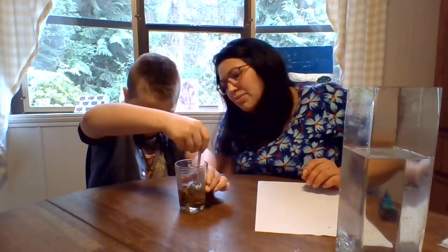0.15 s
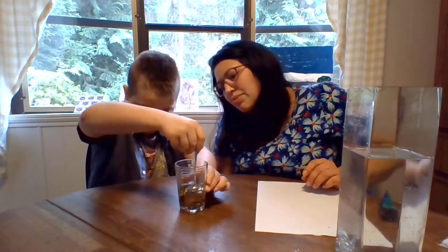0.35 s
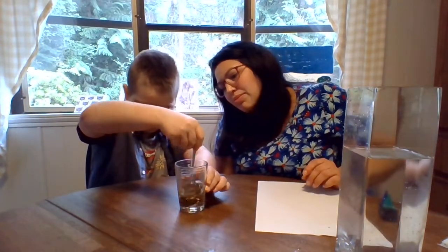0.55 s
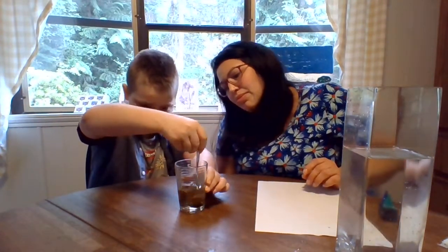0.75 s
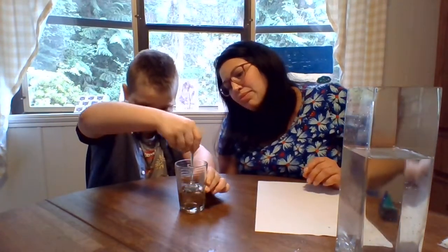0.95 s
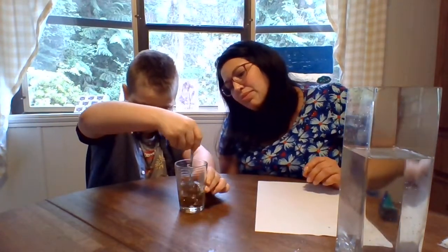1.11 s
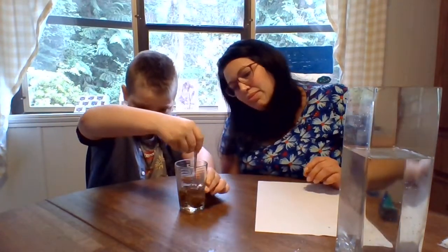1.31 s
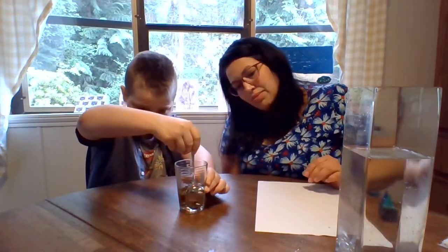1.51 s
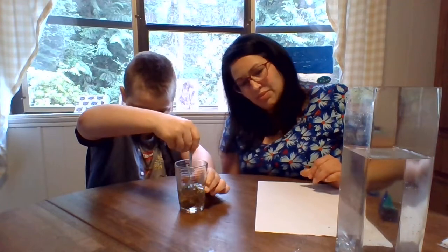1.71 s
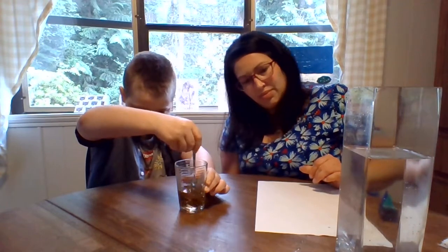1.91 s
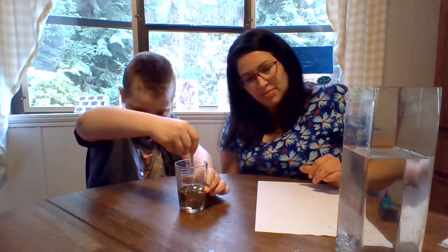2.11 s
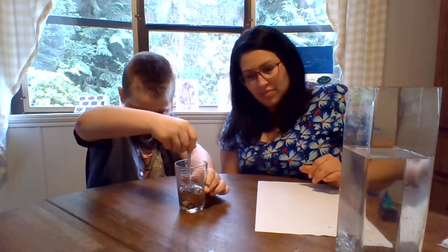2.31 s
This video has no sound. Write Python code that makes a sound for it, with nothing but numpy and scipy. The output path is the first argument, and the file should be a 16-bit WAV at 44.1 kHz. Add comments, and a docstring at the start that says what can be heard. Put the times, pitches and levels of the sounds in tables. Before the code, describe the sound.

A metal spoon stirs liquid in a small glass, clinking four times over dull table knocks.

```python
"""A low churning rumble, then a metal spoon clinks brightly on the wall of a small glass. On each turn the
glass rings with a rough, wavering shimmer and bumps the wooden table, which knocks. Between turns the spoon
sticks and slips along the glass with a soft, squeaky scrape. A small room gives the hits a short tail; the
microphone adds hiss, hum and a faint whine."""
import sys
import numpy as np
from scipy import signal
from scipy.fft import rfft, irfft
from scipy.io import wavfile
from scipy.ndimage import uniform_filter1d, map_coordinates

SR = 44100
rng = np.random.default_rng(int(sys.argv[2]) if len(sys.argv) > 2 else 0)


def put_to_file(sound):
    """Save the sound as 16-bit audio at rate SR, in the file named by the first command-line argument."""
    columns = np.atleast_2d(sound).T  # one column per channel
    safe = np.clip(columns, -1, 1)
    whole_steps = np.round(safe * 32767)
    wavfile.write(sys.argv[1], SR, whole_steps.astype(np.int16))


N = 103635
TIME = np.arange(N) / SR

# colour of the microphone hiss: f/Hz, level/dB
HISS_COLOUR = [(30, -52), (80, 2), (400, 5.5), (1500, -1), (3000, -13.5), (6000, -14), (10000, -5.5),
               (11300, -9), (12500, -95)]
# hum and whine tones: f/Hz, rms level/dB
WHINE_TONES = [(85, -66), (2003, -75.5), (4011, -75.5), (5012, -75), (6013, -80), (8699, -76),
               (11025, -74.5)]
# colour of the low churning: f/Hz, level/dB
CHURN_COLOUR = [(45, -54), (80, -14), (115, 1), (150, 2.5), (200, -5.5), (290, -4), (400, -19.5),
                (600, -24.5), (850, -26.5), (1300, -36), (3000, -49.5)]
# fader ride of the churning: t/s, level/dB
CHURN_RIDE = [(0, -41.5), (0.148, -53.5), (.36, -39), (.44, -49), (0.489, -42.5), (.56, -58), (.72, -43.5),
              (.96, -42), (1.01, -53.5), (1.07, -44), (1.128, -50.5), (1.21, -45.5), (1.32, -39.5),
              (1.49, -57), (1.55, -44.5), (1.69, -45.5), (1.729, -52), (1.78, -43.5), (1.87, -45),
              (1.97, -41), (2.16, -55), (2.218, -40), (2.35, -65.5)]
# colour of the spoon's scrape: f/Hz, level/dB
SCRAPE_COLOUR = [(300, -15), (650, -17), (780, -7.5), (850, -4.5), (930, -17), (1100, -33), (1650, -24),
                 (2200, -46), (8000, -50)]
# spoon rubs the glass: t/s, length/s, level/dB, scrape trim/dB
RUB_CUES = [(.01, 0.083, -60, 13), (0.094, 0.06, -57.5, 12), (0.645, 0.049, -53, 8.5),
            (1.136, .11, -46.5, -2.5), (1.415, 0.13, -55.5, 3), (1.844, 0.055, -58, 4),
            (1.93, 0.05, -30, -13), (1.982, 0.027, -34.5, -4.5), (2.147, 0.16, -60.5, 8.5)]
# colour of the crack when the spoon makes contact: f/Hz, level/dB
CRACK_COLOUR = [(100, -35), (400, -39), (2500, 22), (5500, 13), (8000, -3.5), (10000, 17.5), (12000, -4.5)]
# tick of a light spoon touch: f/Hz, level/dB, t60/s
TICK_MODES = [(3416, -11.5, 0.097), (3840, -8.5, 0.018), (4330, -6, 0.013), (8120, -3, 0.024)]
# table top with the glass on it: f/Hz, level/dB, t60/s
TABLE_MODES = [(113, -31.5, 0.23), (133.1, -32.5, 0.34), (170.5, -15.5, 0.16), (245.6, -22, .25),
               (270.9, -21, 0.21), (318, -17, 0.19), (380.5, -16.5, 0.16), (418.5, -16.5, 0.2),
               (525.4, -19.5, 0.14), (618, -29, .2), (824.5, -25.5, 0.16), (1003, -34.5, 0.14),
               (1577, -37.5, 0.066), (1662, -36, 0.34)]
# colour of the room tail after a knock: f/Hz, level/dB
KNOCK_TAIL_COLOUR = [(45, -18), (110, -12), (200, 0), (340, -13.5), (570, -6.5), (700, -8), (860, -2),
                     (1150, -8), (1500, -9), (2100, -21), (3400, -19.5), (4500, -25), (10000, -21.5)]
# glass bumps the table: t/s, knock level/dB, low-pass f/Hz, tick level/dB
KNOCK_CUES = [(0.2011, -12.5, 1500, -51), (0.2264, -8.5, 497, -32), (0.2658, -1, 1870, -24),
              (0.6075, -7.5, 560, -45.5), (0.777, -24.5, 2500, -37), (.806, -12.5, 493, -33),
              (0.8425, -1, 1870, -29.5), (1.344, -24, 1970, -43), (1.3706, -8.5, 1330, -33),
              (1.788, -29, 49, -83), (1.859, -14, 69, -80), (2.013, -9, 700, -53), (2.043, -5, 1430, -34)]
# the spoon's own short ping: f/Hz, level/dB, t60/s
PING_MODES = [(4860, -31.5, 0.029), (6340, -38, 0.06), (8200, -27, 0.024), (8140, -15.5, 0.0073)]
# ring of glass and spoon: f/Hz, level/dB, build-up/s, base hold/s, t60/s, shimmer f/Hz, shimmer depth
GLASS_MODES = [(2578, -44, 0.0026, 0.064, 0.31, 68, 4.5), (2725, -37.5, .004, 0.041, 0.34, 38.7, 1.8),
               (2762, -35.5, 0.084, 0.13, 0.21, 21.3, 0.75), (3847, -44, 0.008, 0.049, 0.39, 250, 3.6),
               (5560, -50.5, 0.012, 0.21, 0.1, 51.8, 0.71), (6342, -37.5, 0.0058, 0.1, 0.22, 2, 0.43),
               (8165, -35, 0.0023, 0.077, 0.41, 110, 0.91), (8208, -30, .002, 0.093, 0.23, 33.5, 1.5),
               (10650, -49, .004, 0.044, 0.49, 260, 2.5), (11320, -40.5, 0.0016, 0.0083, 0.36, 82, 0.54)]
# EQ points that shade the ring from clink to clink: f/Hz
RING_EQ_HZ = [2716, 2750, 6342, 8200]
# colour of the room tail after a clink: f/Hz, level/dB
CLINK_TAIL_COLOUR = [(80, -16), (300, 31), (900, 10), (1700, 14.5), (2100, 5), (2600, 9.5), (3200, -1.5),
                     (4600, -2), (6500, 5.5), (7900, 8.5), (8900, -0.5), (11500, -14)]
# spoon strikes the wall: t/s, level/dB, hold factor, then gain/dB at each point of RING_EQ_HZ
CLINK_CUES = [(0.1994, 0.84, 0.79, 4, 1.7, -1.5, -7), (0.7737, 1, 1.02, -2.5, -0.85, -10, -3),
              (1.3422, 0.19, 0.94, -7, 1, -11, -3), (2.0103, 1, 0.83, -0.5, -2.2, -4.5, -5)]


def from_db(db):
    return 10 ** (np.asarray(db) / 20)


def unit_rms(x):
    return x / np.sqrt(np.mean(np.abs(x) ** 2) + 1e-20)


def noise(colour):
    """Noise of the given colour, rms 1."""
    hz, db = np.transpose(colour)
    bins_hz = np.maximum(np.fft.rfftfreq(N, 1 / SR), 1)
    gain = from_db(np.interp(np.log(bins_hz), np.log(hz), db))
    return unit_rms(irfft(rfft(rng.standard_normal(N)) * gain, N))


def drift(rate):
    """Smooth random modulation through `rate` points a second, rms 1."""
    points, coarse_time = rng.standard_normal(4096), TIME[::32]
    curve = map_coordinates(points, [coarse_time * rate], order=2, mode="wrap")
    return unit_rms(np.interp(TIME, coarse_time, curve))


def fade(t60, hold=0):
    """Envelope that stays up for about the hold time, then falls 60 dB every t60 seconds."""
    return from_db(-60 * (np.sqrt(np.hypot(TIME ** 2, hold ** 2)) - hold) / t60)


def sine(hz):
    return np.sin(2 * np.pi * hz * TIME)


def at(start, sound):
    """Places a sound on the timeline, `start` seconds in."""
    return np.concatenate([np.zeros(int(start * SR)), sound])[:N]


def microphone_noise():
    """The bed: hiss, a faint hum and a thin electrical whine."""
    whine = sum(np.sqrt(2) * from_db(db) * sine(hz) for hz, db in WHINE_TONES)
    return from_db(-59.5) * noise(HISS_COLOUR) + whine


def low_churn(smooth_s=0.052):
    """A low churning rumble, levelled flat, then ridden up and down."""
    times, db = np.transpose(CHURN_RIDE)
    rumble = noise(CHURN_COLOUR)
    running_rms = np.sqrt(uniform_filter1d(rumble ** 2, int(smooth_s * SR)) + 1e-9)
    return from_db(np.interp(TIME, times, db)) * rumble / running_rms


def spoon_rubs(squeak_hz=858, wander=0.014):
    """The spoon sticks and slips: a wavering squeak in resonant scraping, with a short tail."""
    out = np.zeros(N)
    pitch_hz = squeak_hz * (1 + wander * drift(rate=90))
    squeak = from_db(-3.5) * np.sin(2 * np.pi * np.cumsum(pitch_hz) / SR)
    scrape = noise(SCRAPE_COLOUR)
    for start, length, db, scrape_db in RUB_CUES:
        stroke = np.sin(np.pi * np.clip(TIME / length, 0, 1))
        tail = from_db(-6) * at(length / 2, fade(t60=0.46))
        out += from_db(db) * at(start, stroke + tail) * (squeak + from_db(scrape_db) * scrape)
    return out


def table_knocks(attack_s=0.0013, spread_db=2.5, bass_build_s=0.018, bass_hz=169):
    """The spoon ticks and the glass bumps the table, ringing wood and room, from deep thud to rap."""
    out = np.zeros(N)
    modes = []
    for k, (hz, db, t60) in enumerate(TABLE_MODES):
        swell = 1 - np.exp(-TIME / bass_build_s * (hz / bass_hz) ** 2)  # bass builds slowly in the room
        modes.append((-1) ** k * from_db(db) * sine(hz) * fade(t60) * swell)
    tick = sum(from_db(db) * sine(hz) * fade(t60) for hz, db, t60 in TICK_MODES)
    tick += from_db(-15) * noise(CRACK_COLOUR) * fade(t60=0.03)
    room_tail = from_db(-25) * noise(KNOCK_TAIL_COLOUR) * fade(t60=0.31, hold=0.0099)
    attack = 1 - np.exp(-TIME / attack_s)
    for start, knock_db, cutoff_hz, tick_db in KNOCK_CUES:
        wood = sum(from_db(spread_db * rng.standard_normal()) * mode for mode in modes)
        knock = signal.lfilter(*signal.butter(1, cutoff_hz, fs=SR), (wood + room_tail) * attack)
        out += at(start, from_db(knock_db) * knock + from_db(tick_db) * tick)
    return out


def glass_ring(hold_factor, eq_db):
    """The struck glass sings: its modes build up in the room with a rough, wavering shimmer."""
    ring = np.zeros(N)
    for hz, db, build_s, hold_s, t60, shimmer_hz, depth in GLASS_MODES:
        envelope = fade(t60, hold_s * hold_factor) * (1 - np.exp(-(TIME / build_s) ** 2))
        shimmer = 1 + depth * (drift(2 * shimmer_hz) + 1j * drift(2 * shimmer_hz))  # level and phase
        shimmer /= np.sqrt(np.average(np.abs(shimmer) ** 2, weights=envelope ** 2))  # keeps the energy
        tone = np.imag(shimmer * np.exp(2j * np.pi * hz * TIME))
        ring += from_db(db + np.interp(hz, RING_EQ_HZ, eq_db)) * envelope * tone
    return ring


def spoon_clinks():
    """Metal strikes the glass wall: a crack and a ping up front, then the ring and the room tail."""
    out = np.zeros(N)
    ping = sum(from_db(db) * sine(hz) * fade(t60) for hz, db, t60 in PING_MODES)
    room = from_db(-30.5) * noise(CLINK_TAIL_COLOUR)
    for start, db, hold_factor, *eq_db in CLINK_CUES:
        crack = from_db(-31) * noise(CRACK_COLOUR) * fade(t60=0.026)
        room_tail = room * fade(t60=0.43, hold=0.027 * hold_factor)
        out += from_db(db) * at(start, crack + ping + glass_ring(hold_factor, eq_db) + room_tail)
    return out


def scene():
    """The mono mix: clinks and knocks on top, rubs, churning and hiss underneath."""
    return (spoon_clinks() + table_knocks() + spoon_rubs() + low_churn() + microphone_noise())[None]


def record(dry, low_cut_hz=70, high_cut_hz=11900):
    """The microphone rolls off the deep bass and cuts the top steeply."""
    low_cut = signal.butter(2, low_cut_hz, "high", fs=SR, output="sos")
    high_cut = signal.ellip(10, 0.2, 80, high_cut_hz, fs=SR, output="sos")
    return signal.sosfilt(high_cut, signal.sosfilt(low_cut, dry))


dry = scene()
out = record(dry)
put_to_file(out)
```